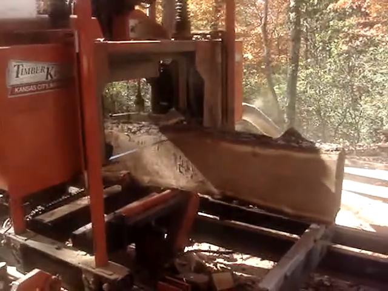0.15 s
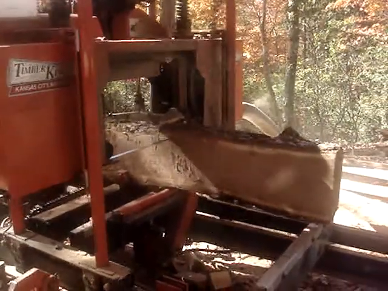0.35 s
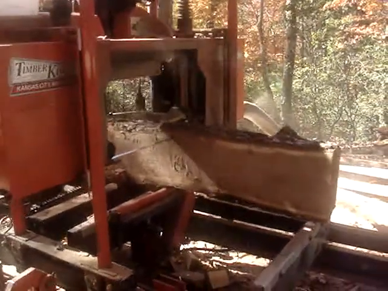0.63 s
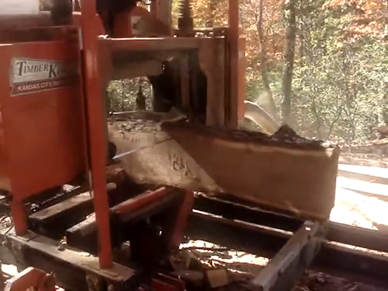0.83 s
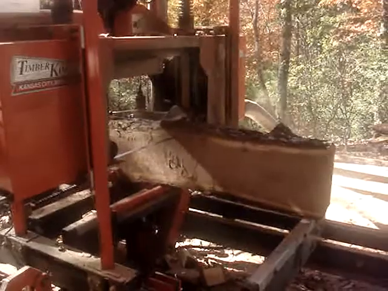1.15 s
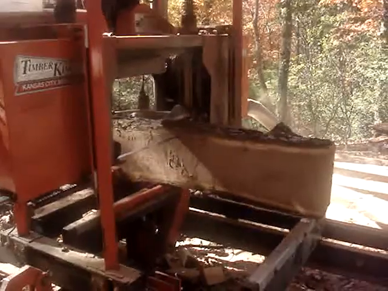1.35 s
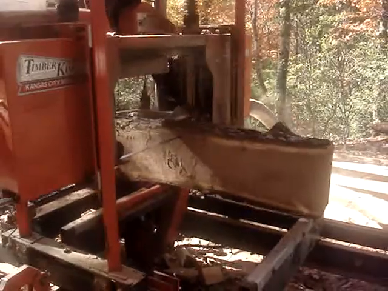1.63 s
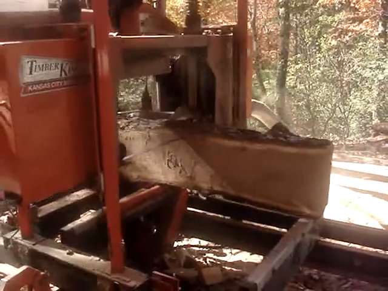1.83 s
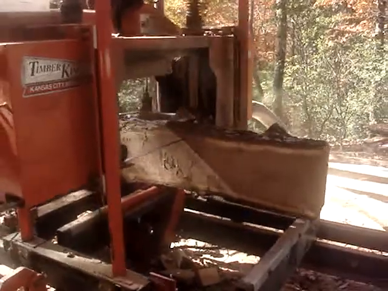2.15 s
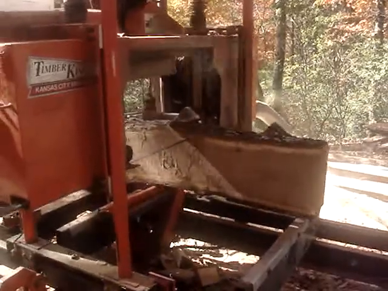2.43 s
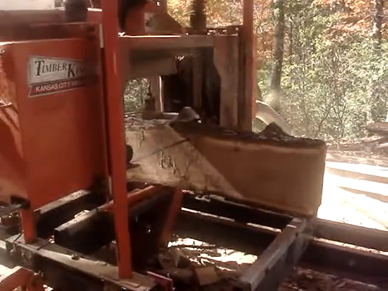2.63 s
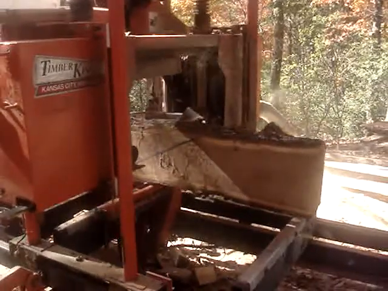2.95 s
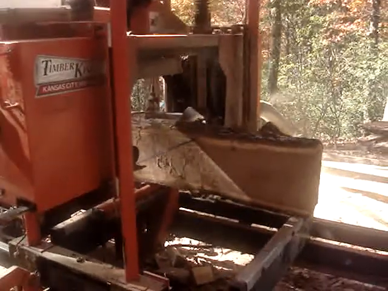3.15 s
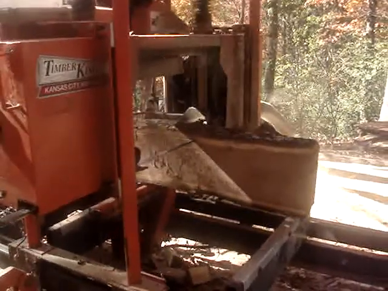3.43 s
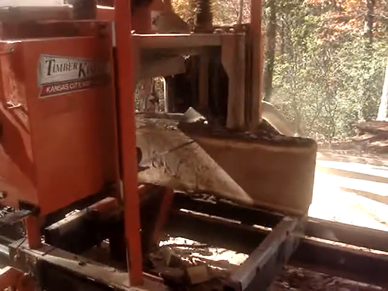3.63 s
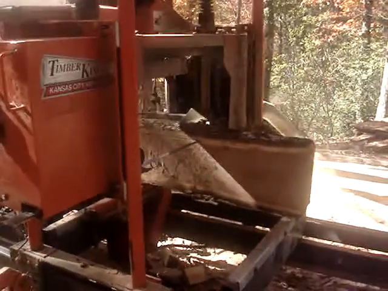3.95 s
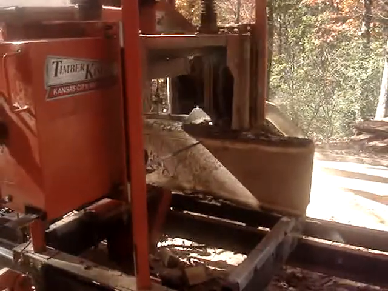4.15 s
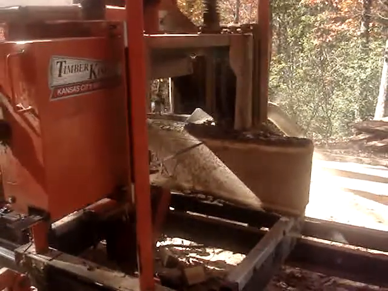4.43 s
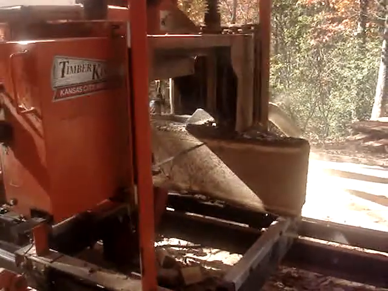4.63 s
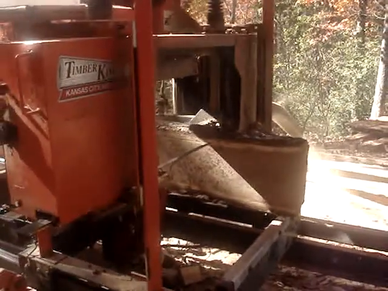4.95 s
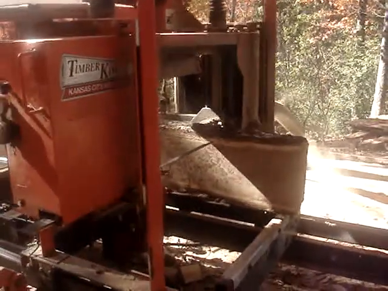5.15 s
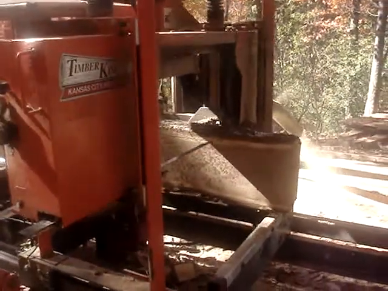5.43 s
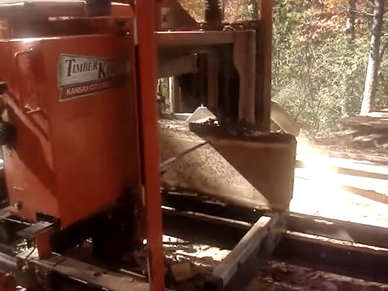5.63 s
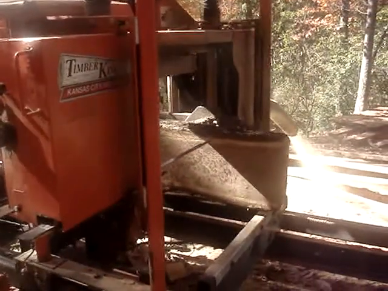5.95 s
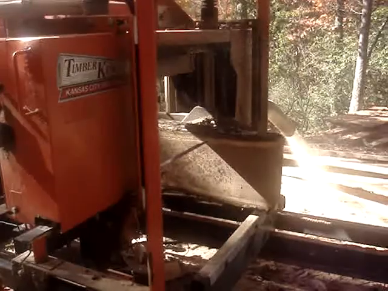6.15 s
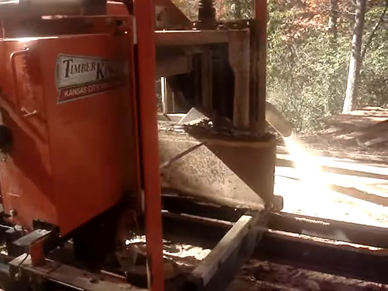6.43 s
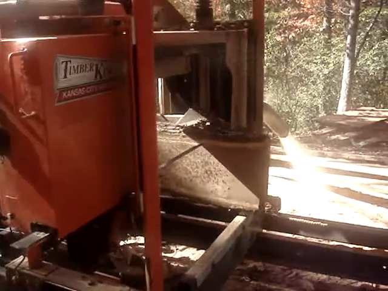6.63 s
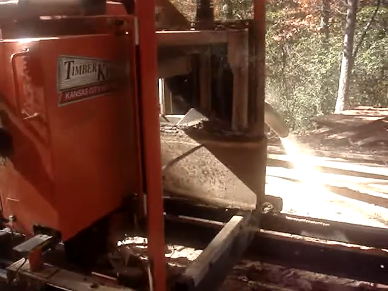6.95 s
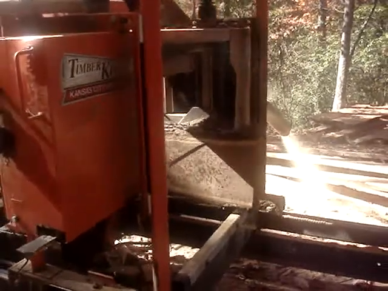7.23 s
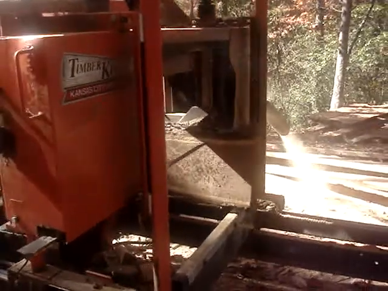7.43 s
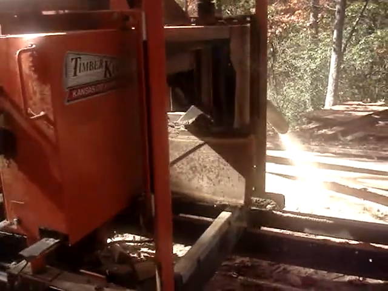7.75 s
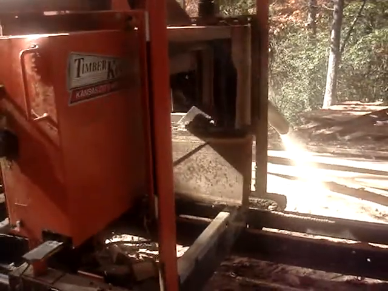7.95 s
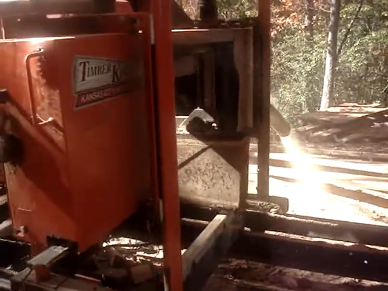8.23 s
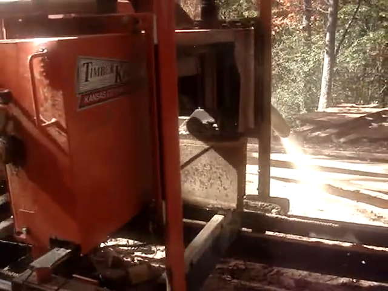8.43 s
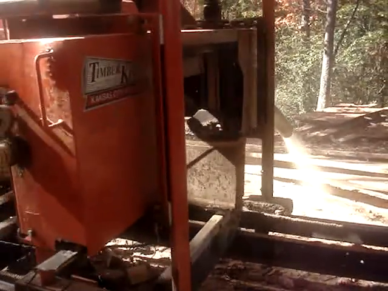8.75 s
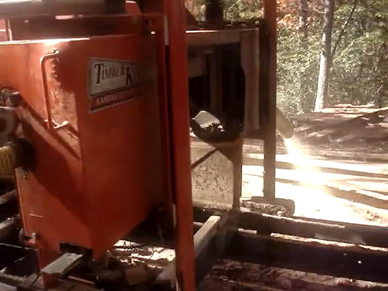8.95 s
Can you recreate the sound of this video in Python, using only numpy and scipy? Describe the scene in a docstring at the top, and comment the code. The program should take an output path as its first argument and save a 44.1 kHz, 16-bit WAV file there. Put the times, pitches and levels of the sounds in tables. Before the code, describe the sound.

Saw teeth rasp continuously through wood with a ringing steel band, roller buzz and spraying sawdust, over a steady petrol engine drone, close by.

```python
"""The rasp of saw teeth is heard first, with a ringing steel band, over an engine that drones and barks
near 3500 rpm: a petrol band sawmill works steadily along a log.
Random impacts excite the band's resonances, a guide roller adds a rough buzz by repeating part of the
noise each turn, and sawdust hisses as coloured impacts. The engine sums sine orders and pulsed, filtered
noise; belt hum, low rumble and moments of singing friction complete the sound."""
import sys
import numpy as np
from scipy import signal
from scipy.fft import rfft, irfft, next_fast_len
from scipy.io import wavfile

SR = 44100
rng = np.random.default_rng(int(sys.argv[2]) if len(sys.argv) > 2 else 0)


def to_wav(s):
    """Save 16-bit WAV."""
    ch = np.atleast_2d(s).T  # columns
    pcm = np.round(np.clip(ch, -1, 1) * 32767)  # PCM
    wavfile.write(sys.argv[1], SR, pcm.astype(np.int16))


N = 401310

# Low rumble spectrum: f/Hz, relative density level/dB
RUMBLE_SPECTRUM = [(12, 1), (25, 3), (60, -3.5), (120, -6), (170, -3), (210, -0.5), (280, -7), (380, -4.5),
                   (600, -9), (1500, -19)]
# Belt drive hum: f/Hz, level/dB
BELT_HUM = [(203, -65), (251, -66.5), (271, -64.5), (305, -61.5)]
# Engine orders before the overall tone is shaped: multiple of the cycle rate, relative level/dB
DRONE_ORDERS = [(1, -12), (2, -13.5), (3, -14), (4, -11), (5, -3), (6, -6.5), (7, -10.5), (8, 1),
                (9, -10.5), (10, -4.5), (11, -5), (12, -8.5), (13, -13.5), (14, -13), (15, -1.5),
                (16, -2.5), (17, -5.5)]
# Strength of the whole drone: t/s, level/dB
DRONE_LEVEL = [(0, -51), (3.4, -51.5), (4, -49.5), (4.6, -52), (7, -52.5), (8.2, -54.5), (8.6, -51.5),
               (9.1, -50)]
# Resonances of muffler and engine housing: f/Hz, width/Hz, relative level/dB
MUFFLER_MODES = [(214, 74, -13), (516, 104, -1.5), (582, 94, 1.5), (663.6, 70, 0), (985, 132, -5.5),
                 (1235, 123, -3.5)]
# Moments when the band sings: t/s at the height, half length/s, f/Hz, width/Hz, level/dB
SINGING_MOMENTS = [(0.29, .4, 7740, 120, -43), (1.2, .45, 6700, 110, -46), (1.3, 0.36, 6300, 75, -46),
                   (.1, 0.23, 4095, 14, -45), (1.5, .35, 4150, 30, -46), (0.82, .35, 2715, 32, -48),
                   (1.95, 0.18, 2700, 39, -42), (3.2, 0.6, 2710, 35, -49), (3.2, 0.34, 3900, 25, -49),
                   (3.9, 1.3, 1103, 9.6, -50), (4.1, 0.57, 5300, 130, -42.5), (5.87, 0.31, 5375, 45, -41.5),
                   (5.7, .25, 5200, 20, -46), (7.6, 0.66, 1601, 6, -47), (7.5, 0.52, 1901, 5.4, -48),
                   (8.3, .3, 1600, 7, -51), (6.3, .3, 8150, 170, -46), (8.9, 0.26, 5300, 160, -40)]
# Dust spectrum at the start of the way: f/Hz, relative density level/dB
HISS_SPECTRUM = [(2500, -32), (4000, -12.5), (4600, -12), (5200, 1), (6600, 0.5), (7200, 0.5), (7700, 1.5),
                 (8700, -0.5), (9100, 0.5), (10000, -3)]
# Dust spectrum once the chute faces the microphone: f/Hz, relative density level/dB
CHUTE_SPECTRUM = [(2500, -29.5), (4000, -14), (4600, -12), (5300, -0.5), (6000, 0), (6800, 1), (7500, -1.5),
                  (8300, 3.5), (8800, 0.5), (9100, 1), (10000, -3)]
# Part of the noise that recurs from one guide roller turn to the next: f/Hz, share
ROLLER_REPEAT = [(800, .05), (2000, 0.2), (3300, 0.32), (5500, 0.39), (7500, 0.073), (10000, .03)]
# Modes of the steel band and its guards: f/Hz, width/Hz, relative level/dB early, relative level/dB late
BAND_MODES = [(993, 12, -2.5, -5.5), (1101, 13.3, 3, 0.5), (1407, 12, -3.5, 2), (1606, 11, 0, -4.5),
              (1663, 22, -0.5, -10), (1782, 11, 0, -2.5), (1884, 11, -1.5, 0), (2067, 44, -3.5, -12),
              (2567, 31, -7, -6), (2681, 64, 1.5, -2.5), (2990, 35, 1.5, -12), (3218, 30, 3, -11.5),
              (3540, 20, 2, -5), (4103, 30, 2, -5), (4220, 25, -3, 0), (4560, 20, -13, -2),
              (4694, 81, -8.5, -4.5), (4763, 38, -3.5, -2), (5400, 71, -7, -4.5), (5880, 82, -3.5, -9),
              (6720, 130, -1.5, -2.5), (8840, 110, -9, -6)]
# Rasp spectrum: f/Hz, relative density level/dB
RASP_SPECTRUM = [(300, -33.5), (450, -9.5), (800, -4.5), (1100, -2), (1450, -1.5), (2400, 1), (2900, -1),
                 (3450, -2), (3800, -4), (4300, -2.5), (5000, -4.5), (7000, -13.5)]
# How hard the teeth work, of which only the swing about the mean is used: t/s, level/dB
CUT_EFFORT = [(0.0, -28.5), (0.05, -27.5), (2.41, -28.5), (2.81, -28), (5.42, -28.5), (5.58, -27.5),
              (5.6, -29.5), (6.38, -29.5), (7.86, -29), (8.08, -31), (8.54, -30), (8.87, -27.5),
              (9.1, -29.5)]
# Progress of the saw head: t/s, share of its way
HEAD_TRAVEL = [(0, 0.26), (3, 0.11), (6.5, 0.62), (9.1, 1)]

# Layer level at mean effort (dB), and the share of the effort's swing that it follows
RUMBLE_DB, RUMBLE_FOLLOWS = -54, 0.6
BARK_DB, BARK_FOLLOWS = -41, 0.88
HISS_DB, HISS_FOLLOWS = -29.5, 0.92
RASP_DB, RASP_FOLLOWS = -31, 0.87
CHUTE_GAIN_DB = 0.5  # extra dust level at the end of the way
BARK_SURGE_DB, BARK_SURGES_HZ = 0.6, 5  # spread and rate of random exhaust surges
BOOM_HZ, BOOM_WIDTH_HZ, BOOM_DB = 317, 40, 3  # housing boom; gain at the end of the way
CYCLE_HZ, SAG_HZ_PER_DB = 29.18, 0.2  # four-stroke cycles per second; loss with added effort
SPEED_WANDER = 0.002  # spread, share of the speed
ROLLER_TURNS = 3.829  # guide roller turns per engine cycle
WHEEL_DB, WOOD_GRAIN_DB = 0.37, 0.5  # bite: sine amplitude per wheel turn; spread from the wood's grain
RING_DB, TEETH_DB = -6, -1.83  # the two parts of the rasp
CUTOFF_HZ = 10170  # edge where the stop band begins


def from_db(db):
    """Logarithmic level law: convert decibels to amplitude gain."""
    return 10 ** (np.asarray(db) / 20)


def rms_one(x):
    """Power normalisation: divide by the root mean square."""
    return x / np.sqrt(np.mean(x ** 2) + 1e-20)


def in_time(rows):
    """Linear interpolation: give each column of a curve a value at every sample."""
    s, *columns = np.transpose(rows)
    return [np.interp(np.arange(N) / SR, s, column) for column in columns]


def drift(rate_hz):
    """Low-pass filtered noise: a slow random fluctuation of spread 1."""
    step = 40  # samples between computed values
    pole = np.exp(-2 * np.pi * rate_hz * step / SR)
    noise = rng.standard_normal(N // step + 2002)
    slow = signal.lfilter([1], [1, -2 * pole, pole * pole], noise)[2000:]  # drop the onset
    return np.interp(np.arange(N) / step, np.arange(len(slow)), rms_one(slow))


def coloured(x, spectrum):
    """Linear filtering in the frequency domain: shape a spectrum and return unit power."""
    size = next_fast_len(N)
    hz, db = np.transpose(spectrum)
    bins = np.maximum(np.arange(size // 2 + 1) * SR / size, 1)
    gain = from_db(np.interp(np.log(bins), np.log(hz), db))
    # Beyond both ends of the curve the gain falls by 6 dB per octave
    gain = gain * np.minimum(bins / hz[0], 1) * np.minimum(hz[-1] / bins, 1)
    return rms_one(irfft(rfft(x, size) * gain, size)[:N])


def resonate(x, hz, width_hz):
    """Damped resonance: a two-pole band-pass with gain near 1 at its peak."""
    r = np.exp(-np.pi * width_hz / SR)
    zeros = np.array([1, 0, -1]) * (1 - r * r) / 2
    poles = [1, -2 * r * np.cos(2 * np.pi * hz / SR), r * r]
    return signal.lfilter(zeros, poles, x)


def narrow_noise(hz, width_hz):
    """Cascaded resonance: two equal stages turn white noise into a narrow band of unit power."""
    once = resonate(rng.standard_normal(N), hz, width_hz)
    return rms_one(resonate(once, hz, width_hz))


def puffs(turns, decay):
    """Periodic exponential decay: one burst per turn, scaled to mean 1."""
    burst = np.exp(-(turns % 1) / decay)
    return burst / burst.mean()


def grains(per_s, spread_db):
    """Shot noise: sparse random impacts of uneven size and either sign, at unit power."""
    sizes = from_db(spread_db * np.minimum(rng.exponential(1, N), 4))
    struck = rng.random(N) < per_s / SR
    return rms_one(struck * sizes * rng.choice([-1, 1], N))


def rumble(effort_db):
    """Broadband noise: a low spectrum whose level follows the effort of the cut."""
    level = from_db(RUMBLE_DB + RUMBLE_FOLLOWS * effort_db)
    return level * coloured(rng.standard_normal(N), RUMBLE_SPECTRUM)


def belts():
    """Narrow-band noise: the belt drive hums unsteadily at a few frequencies."""
    return sum(from_db(db) * narrow_noise(hz, 7) for hz, db in BELT_HUM)


def drone(cycles, waver_db):
    """Harmonic synthesis: low engine orders, each wavering a little in level and phase."""
    out = 0
    for order, db in DRONE_ORDERS:
        stray = 0.029 * drift(3.5)  # in periods
        level = from_db(db + waver_db * drift(2.9))
        out = out + level * np.sin(2 * np.pi * (order * cycles + stray + rng.random()))
    return coloured(out, [(25, -14), (58, 0.5), (85, -2.0), (140, -1.0), (600, -1.5)])


def exhaust(cycles, steady, uneven_db):
    """Modulated turbulence: two firings a cycle drive noise through the muffler's resonances."""
    firing = puffs(2 * cycles, decay=0.44) * from_db(uneven_db * drift(25))
    gas = rng.standard_normal(N) * (steady + firing)
    pipe = 0
    for k, (hz, width, db) in enumerate(MUFFLER_MODES):
        pipe = pipe + (-1) ** k * from_db(db) * resonate(gas, hz, width)  # alternate the sign
    return coloured(pipe, [(100, -12.5), (220, 0.5), (370, -5.5), (500, 1), (1300, -0.5), (2500, -17)])


def engine(cycles, effort_db, travel):
    """Superposition: load-dependent exhaust bark, drone, and housing boom as the head comes near."""
    drone_db, = in_time(DRONE_LEVEL)
    hum = from_db(drone_db) * drone(cycles, waver_db=1.3)
    boom = from_db(BOOM_DB) * travel ** 2 * resonate(hum, BOOM_HZ, BOOM_WIDTH_HZ)
    bark_db = BARK_DB + BARK_FOLLOWS * effort_db + BARK_SURGE_DB * drift(BARK_SURGES_HZ)
    bark = from_db(bark_db) * exhaust(cycles, steady=1.64, uneven_db=2.1)
    return bark + hum + boom


def singing():
    """Frictional excitation: where the band rubs in the kerf, one resonance stands out for a moment."""
    t, out = np.arange(N) / SR, 0
    for peak_s, half_length, hz, width, db in SINGING_MOMENTS:
        swell = np.exp(-((t - peak_s) / half_length) ** 2)
        out = out + from_db(db) * swell * narrow_noise(hz, 2 * width)
    return out


def over_roller(x, turn_hz):
    """Comb filtering: part of the noise recurs each guide roller turn, giving rough spectral lines."""
    size = next_fast_len(N)
    bins = np.arange(size // 2 + 1) * SR / size
    share = np.clip(np.interp(bins, *np.transpose(ROLLER_REPEAT)), 0, 0.8)
    feedback = share * np.exp(-2j * np.pi * bins / turn_hz)  # delayed by one turn
    return rms_one(irfft(rfft(x, size) / (1 - feedback), size)[:N])


def shimmer(x, width_hz, depth, rate_hz, count=16):
    """Independent band modulation: narrow bands of the hiss swell and fade slowly."""
    centres = np.geomspace(4500, 9700, count)
    return x + sum(depth * drift(rate_hz) * resonate(x, hz, width_hz) for hz in centres)


def sawdust(bite, roller, roller_hz, travel):
    """Granular impacts: chips strike the guard early; later more are heard from the chute's mouth."""
    spurts = from_db(0.5 * drift(50)) * (1 + 0.076 * puffs(roller, decay=0.25))
    chips = bite * spurts * grains(per_s=30000, spread_db=2.0)
    chips = shimmer(over_roller(chips, roller_hz), width_hz=150, depth=0.15, rate_hz=1.2)
    return (1 - travel) * coloured(chips, HISS_SPECTRUM) + travel * coloured(chips, CHUTE_SPECTRUM)


def band_ring(bite, travel, wander_db):
    """Modal excitation: teeth keep the band ringing, its balance shifting as the head travels."""
    out = 0
    for hz, width, early, late in BAND_MODES:
        level = from_db(early + (late - early) * travel + wander_db * drift(1.3))
        out = out + level * resonate(bite, hz, width)
    return rms_one(out)


def cut(bite, roller, roller_hz, travel):
    """Impact excitation: teeth tear the fibres and set the band ringing."""
    teeth = bite * grains(per_s=12000, spread_db=2.0) * (1 + 0.08 * puffs(roller, decay=0.28))
    tearing = coloured(over_roller(teeth, roller_hz), RASP_SPECTRUM)
    ring = band_ring(bite * grains(per_s=9000, spread_db=2.0), travel, wander_db=1.34)
    return from_db(TEETH_DB) * tearing + from_db(RING_DB) * ring


def scene():
    """Linear superposition: all layers add, with cut, dust, bark and rumble following the effort."""
    effort_db, = in_time(CUT_EFFORT)
    effort_db = effort_db - effort_db.mean()
    travel, = in_time(HEAD_TRAVEL)
    speed = CYCLE_HZ - SAG_HZ_PER_DB * effort_db
    cycles = np.cumsum(speed * (1 + SPEED_WANDER * drift(6))) / SR
    roller = ROLLER_TURNS * cycles + 0.092 * drift(2.5)  # in turns
    roller_hz = ROLLER_TURNS * speed.mean()
    wheel = np.sin(2 * np.pi * roller / 6)  # one band wheel turn per six roller turns
    bite = from_db(WHEEL_DB * wheel + WOOD_GRAIN_DB * drift(35))

    background = rumble(effort_db) + belts() + engine(cycles, effort_db, travel) + singing()
    dust_db = HISS_DB + HISS_FOLLOWS * effort_db + CHUTE_GAIN_DB * travel
    dust = from_db(dust_db) * sawdust(bite, roller, roller_hz, travel)
    rasp = from_db(RASP_DB + RASP_FOLLOWS * effort_db) * cut(bite, roller, roller_hz, travel)
    mill = background + dust + rasp
    return np.array([mill, mill])  # the same in both channels


def record(dry):
    """Band limitation: a steep zero-phase low-pass removes the top of the spectrum."""
    low_pass = signal.cheby2(40, 45, CUTOFF_HZ, fs=SR, output="sos")
    return signal.sosfiltfilt(low_pass, dry)


dry = scene()
out = record(dry)
to_wav(out)
```